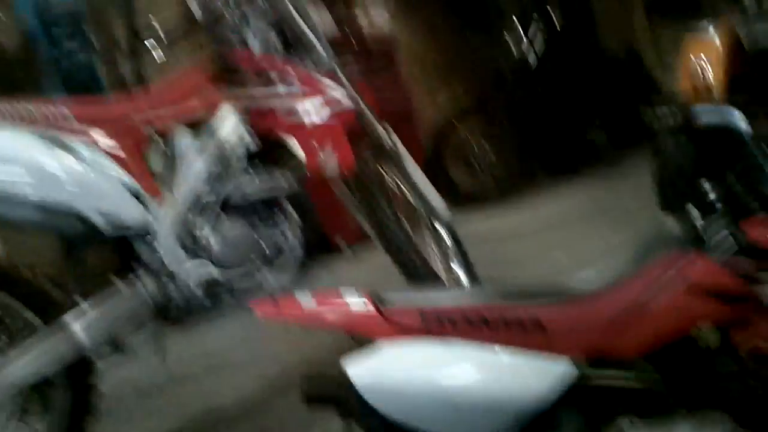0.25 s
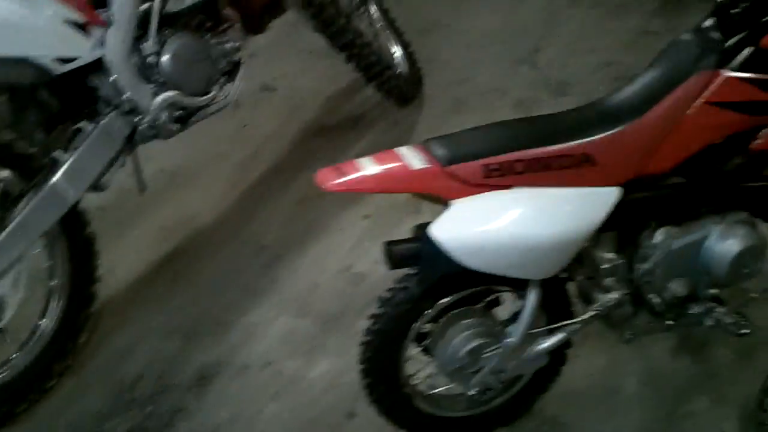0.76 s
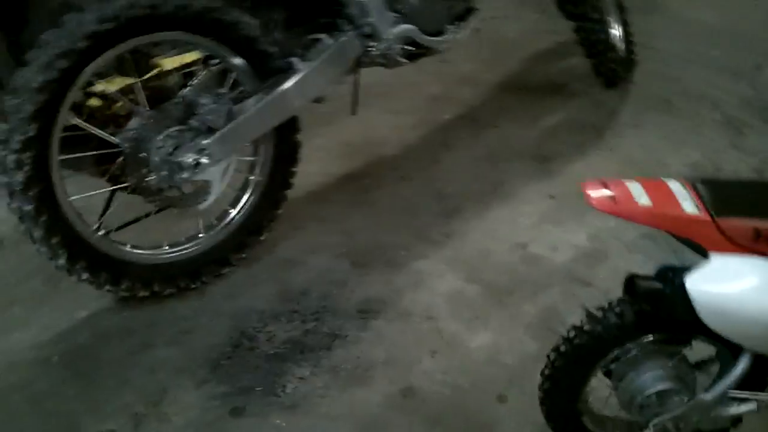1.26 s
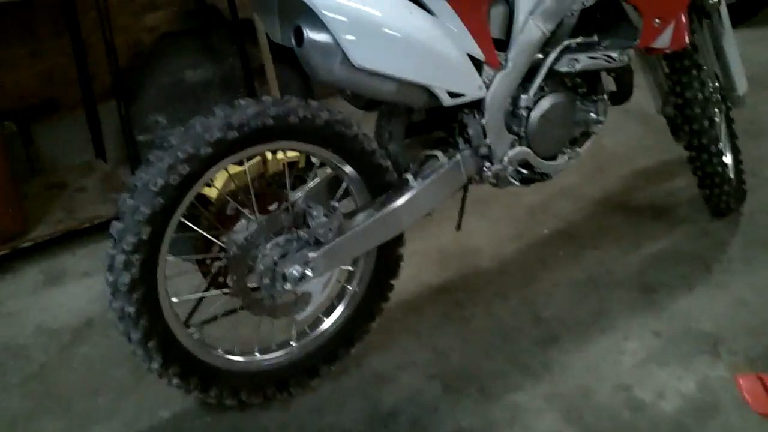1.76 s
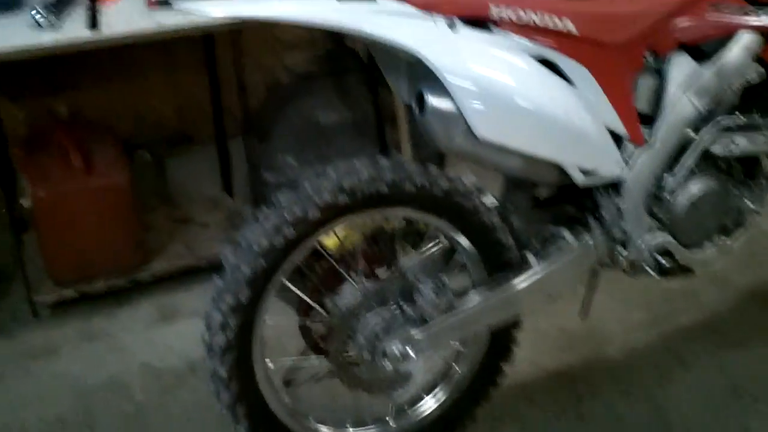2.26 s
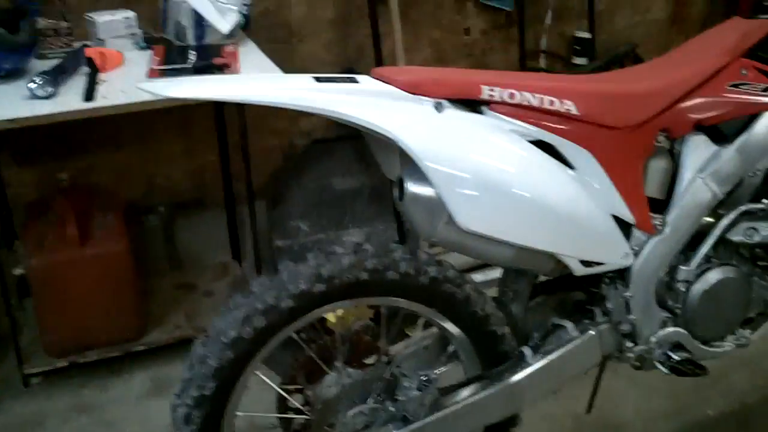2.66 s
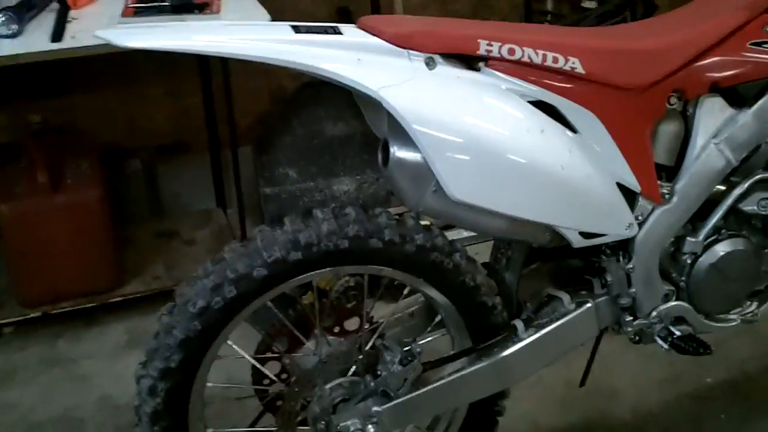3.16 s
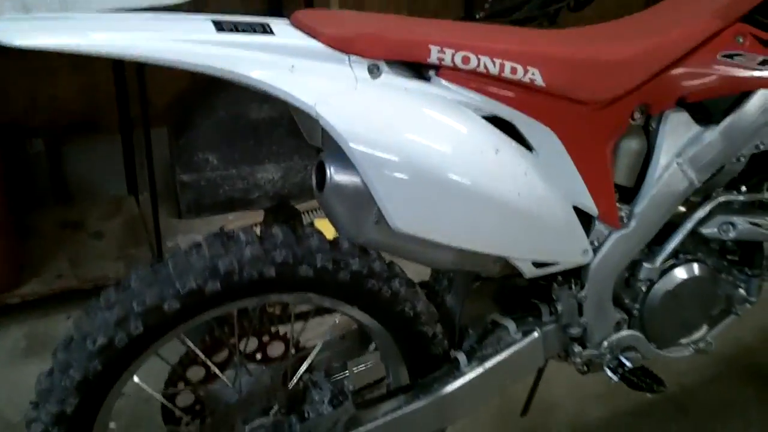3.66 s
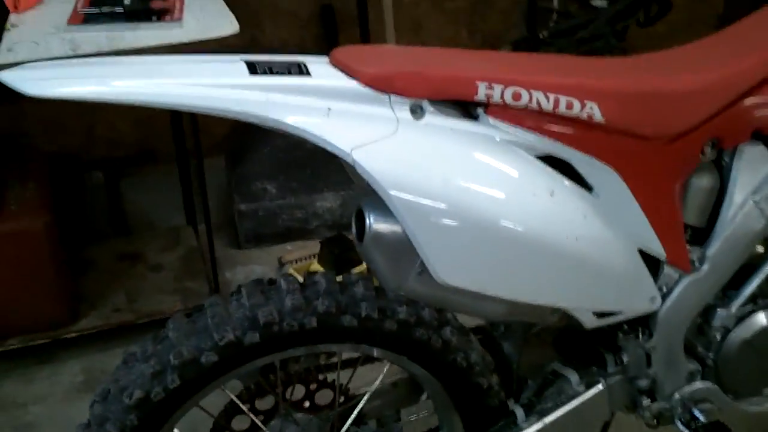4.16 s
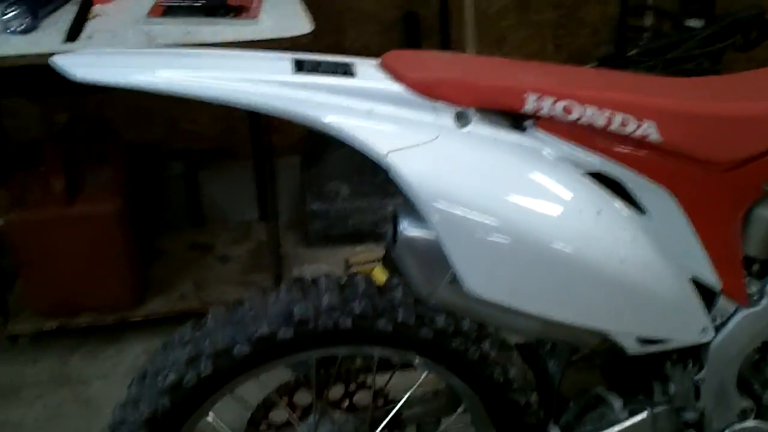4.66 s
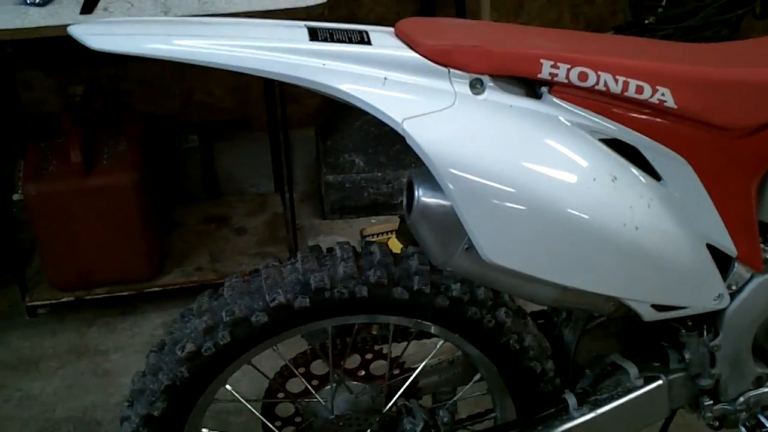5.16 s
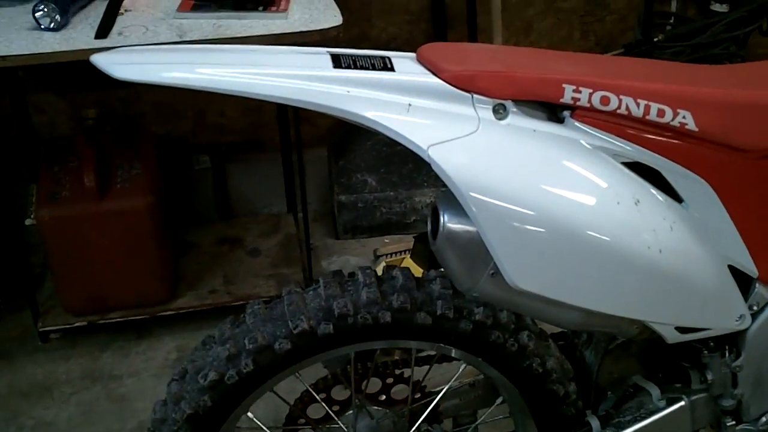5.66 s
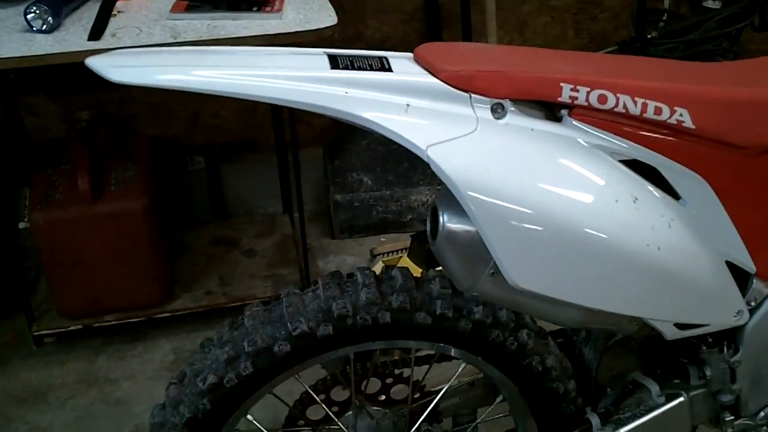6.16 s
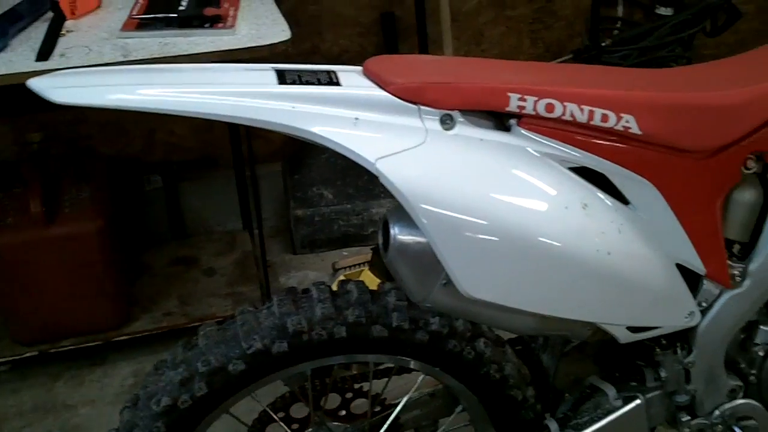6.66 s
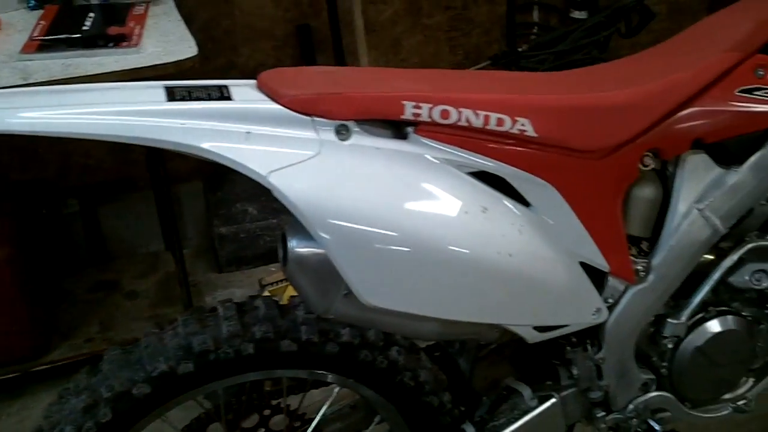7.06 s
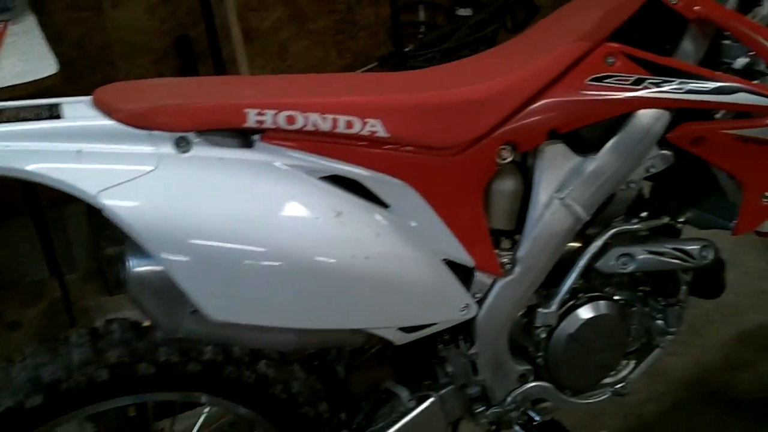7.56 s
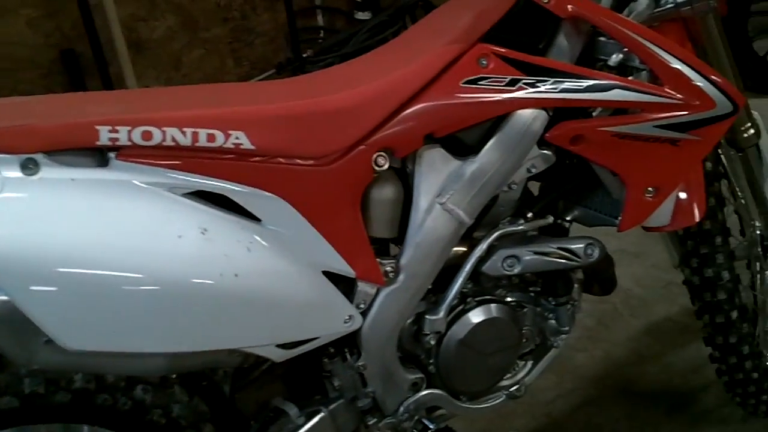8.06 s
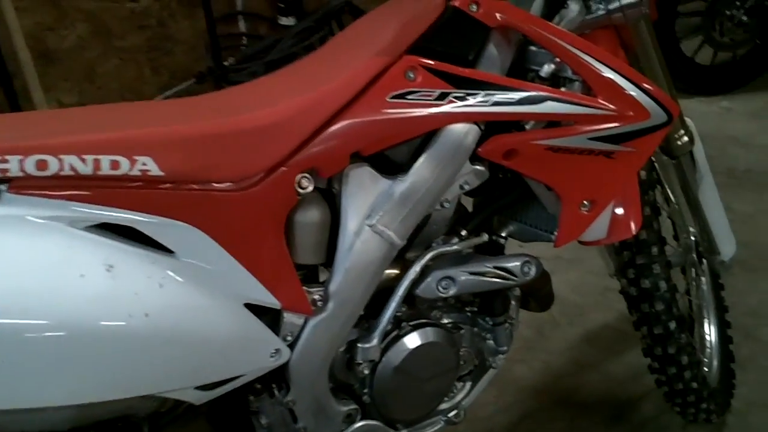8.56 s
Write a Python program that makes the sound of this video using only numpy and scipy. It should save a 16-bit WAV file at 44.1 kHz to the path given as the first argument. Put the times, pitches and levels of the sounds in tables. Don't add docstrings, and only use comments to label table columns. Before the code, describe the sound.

Continuous idle of a four-stroke off-road motorcycle in a small hard-walled garage. The exhaust note is low, rapid and hollow, hunting slightly in speed and repeatedly limping as every other firing fails and air puffs from the silencer. Around it sit hard valve ticks, rattling case metal and a steady grainy whirr. The handheld camera microphone walks closer, changing the balance of boom, bark and clatter; the engine never revs or stops.

```python
import sys
import numpy as np
from scipy import signal
from scipy.fft import rfft, irfft
from scipy.io import wavfile
from scipy.ndimage import uniform_filter1d

SR = 44100
rng = np.random.default_rng(int(sys.argv[2]) if len(sys.argv) > 2 else 0)


def generate_wav(signal):
    frames = np.transpose(np.atleast_2d(signal))
    scaled = np.clip(frames, -1, 1) * 32767
    pcm = np.round(scaled).astype(np.int16)
    wavfile.write(sys.argv[1], SR, pcm)


def invert_db(x):
    u = np.asarray(x, float) / 20
    return 10 ** u


N = 388962
TIME = np.arange(N) / SR


def level(x, db):
    return x * invert_db(db) / np.sqrt(np.mean(x ** 2))


def clicks(s, size):
    at = np.clip(s * SR, 0, N)
    i = at.astype(int)
    size = size * (s > -.005)
    early = np.bincount(i, size * (i + 1 - at), N + 2)
    late = np.bincount(i + 1, size * (at - i), N + 2)
    return (early + late)[:N]


def mode(x, hz, t60, bend=0):
    turn = np.exp(2j * np.pi * hz / SR * (np.arange(N) + bend))
    decay = np.exp(-np.log(1000) / (t60 * SR))
    return (turn * signal.lfilter([1], [1, -decay], x / turn)).imag


def ring(s, size, modes, bend=0):
    x = clicks(s, size)
    return sum(invert_db(db) * mode(x, hz, t60, bend) for hz, t60, db in modes)


def push(x, ms):
    return np.convolve(x, np.hanning(int(ms * SR / 1000) + 3))[:N]


def colour(x, points):
    hz, db = np.transpose(points)
    log_hz = np.log(np.fft.rfftfreq(N, 1 / SR) + 1)
    return irfft(rfft(x) * invert_db(np.interp(log_hz, np.log(hz), db)), N)


def flutter(rate):
    k = int(SR / rate)
    return uniform_filter1d(np.repeat(rng.standard_normal(N // k + 1), k), k)[:N]


# t/s, place (0 far wall, 1 mid floor, 2 rear wheel, 3 silencer, 4 engine)
CAMERA_WALK = [(0, 0.), (.45, 0.57), (.85, 0.7), (1.3, 1.14), (1.5, 1.3), (1.9, 1.5), (2.53, 2.),
               (2.61, 2.5), (3.5, 3.5), (4.1, 3.0), (4.4, 4), (5.5, 4), (6.5, 3.5), (7.6, 4.5), (8.1, 3.5),
               (8.82, 9)]


def camera_place():
    s, place = np.transpose(CAMERA_WALK)
    return np.interp(TIME, s, place)


PART_LEVELS = {"thump": (-24, -22, -26, -25, -24), "boom": (-24, -28.5, -39, -31, -25.5),
               "body": (-19, -28, -27.5, -22, -24), "bark": (-36, -20, -23, -21.5, -22),
               "honk": (-29.5, -38, -70, -35, -38.5), "knock": (-34, -28, -26.5, -34.5, -30),
               "whirr": (-32.5, -30.5, -30.5, -31.5, -31), "air": (-58, -55, -55, -56, -57),
               "drone": (-42, -38, -60, -62, -62), "once": (-27, -26, -26, -27, -30),
               "twice": (-28, -28, -27, -26, -24.5)}


def heard(part):
    return invert_db(np.interp(camera_place(), np.arange(5), PART_LEVELS[part]))


# t/s, time between firings [ms]
IDLE_SPEED = [(0, 30.189), (.61, 30.04), (.98, 30.716), (1.4, 29.87), (2.52, 29.124), (2.53, 29.708),
              (2.94, 30.453), (3.9, 29.672), (3.93, 30.754), (4.63, 29.024), (5.74, 30.243), (5.9, 29.124),
              (6.3, 30.68), (6.37, 29.723), (7.87, 29.201), (7.96, 30.316), (8.1, 29.381), (8.82, 28.852)]
# first t/s, last t/s, share of the burn that fails [0-1], puff level/dB
STUMBLES = [(.215, .215, .54, -55), (.365, .426, .82, -55), (.517, .637, .86, -38), (.667, .789, .66, -48),
            (1.094, 1.094, .7, -40), (1.338, 1.338, .5, -55), (1.457, 1.457, .54, -55),
            (1.932, 1.932, .87, -42), (2.256, 2.256, .88, -42), (2.402, 2.461, .7, -55),
            (2.519, 2.699, 1., -39), (2.759, 2.88, .7, -39), (3.244, 3.305, .8, -47),
            (3.786, 3.786, .97, -40), (3.905, 3.966, .9, -38), (4.329, 4.329, .9, -42),
            (4.74, 4.74, 1., -45), (5.061, 5.182, 1., -35), (5.241, 5.36, .8, -40), (5.57, 5.631, .95, -42),
            (6.077, 6.137, .8, -39), (6.319, 6.319, 1., -37), (6.587, 6.587, 1., -50),
            (6.706, 6.706, 1., -38), (7.002, 7.002, .97, -44), (7.121, 7.239, .6, -55),
            (7.592, 7.592, 1., -43), (7.738, 7.738, .87, -36), (7.884, 7.884, .6, -52),
            (8.444, 8.561, .63, -47)]


def firings():
    drag_ms, drag_kept, margin_s, first_puff_db = .1525, .5, .015, 4
    fire, miss, puff, drag = [-.0869], [0.], [0.], 0.
    while fire[-1] < N / SR:
        drag = drag_kept * drag + drag_ms * miss[-1]
        period = np.interp(fire[-1], *np.transpose(IDLE_SPEED)) + drag
        now = fire[-1] + period / 1000
        failed, spit = 0., 0.
        for first, last, share, db in STUMBLES:
            inside = first - margin_s < now < last + margin_s
            just_missed = miss[-1] > 0 and fire[-1] > first - margin_s
            if inside and not just_missed:
                hardest = now < first + margin_s and last > first + .1
                failed, spit = share, invert_db(db + first_puff_db * hardest)
                break
        fire.append(now)
        miss.append(failed)
        puff.append(spit)
    return np.array([fire, miss, puff])


def pipe_cooling(miss):
    return signal.lfilter([1], [1, -0.72], np.roll(miss, 1))


# f/Hz, t60/s, level/dB
THUMP_RINGS = [(94.3, 0.061, 8), (62, .05, -4)]


def piston_thump(s, miss, cool):
    pump, cool_pump, unburnt, early_s = 0.51, 0.17, 0.56, .001
    size = -(pump * np.exp(-cool_pump * cool) + unburnt * miss)
    thump = push(ring(s + .0004 - early_s * miss, size, THUMP_RINGS), ms=3.)
    thump = colour(thump, [(30, -44), (55, -21.5), (80, -9.5), (900, 24.5)])
    return heard("thump") * level(thump, 0.17)


def firing_hum(fire):
    angle = 2 * np.pi * np.interp(TIME, fire, np.arange(len(fire)))
    once, twice = np.cos(angle - 2.2), np.cos(2 * angle - 4.15)
    return np.sqrt(2) * (heard("once") * once + heard("twice") * twice)


# f/Hz, t60/s, level/dB
BOOM_RINGS = [(132.9, 0.24, 0.015)]
BODY_RINGS = [(160, 0.051, -7), (202, 0.026, -17), (209, 0.053, -13)]
BARK_RINGS = [(302.7, 0.095, 7), (252, 0.024, -5)]
HONK_RINGS = [(402, 0.11, 7.5), (441.7, 0.12, 5.5), (461, 0.2, -7.5), (549, 0.067, 5.5)]
# f/Hz, t60/s, level/dB
DRONE_RINGS = [(491, 0.11, -1), (800, 0.1, -4)]
RETURN_FADE = (1.3, 1.7)
BARK_DETUNE = (-.004, -0.008, 0.034, .004, -0.0028)


def pipe_rings(fire, s, miss, strength_db, cool):
    leftover, leftover_body, cool_pitch = 0.24, 0.23, 0.0081
    burn = -(1 - miss) ** 0.65 * (1 + leftover * np.roll(miss, 1)) * invert_db(strength_db)
    rich = 1 + leftover_body * cool
    back = np.interp(s, RETURN_FADE, (.06, 1))
    both = np.r_[(1 - .75 * back) * burn, -back * burn]
    bend = np.cumsum(-cool_pitch * np.interp(TIME, fire, cool))
    sharp = np.cumsum(np.interp(camera_place(), np.arange(len(BARK_DETUNE)), BARK_DETUNE))
    honk_size = burn * invert_db(rng.standard_normal(len(s)))
    rings = {
        "boom": push(ring(np.r_[s - .001, s + .0078], both, BOOM_RINGS), ms=1.5),
        "body": push(ring(np.r_[s, s + .007], both * np.tile(rich, 2), BODY_RINGS, bend), ms=1.5),
        "bark": push(ring(s - .001, burn, BARK_RINGS, bend + sharp), ms=3.),
        "honk": push(ring(s, honk_size, HONK_RINGS, bend), ms=1.46),
        "drone": push(ring(s, burn, DRONE_RINGS), ms=0.84),
    }
    mix = sum(heard(part) * level(x, 0) for part, x in rings.items())
    return colour(mix, [(40, -6), (75, -68), (110, 3.0), (520, -0.5), (900, -12)])


# time after the exhaust opens [ms], level/dB
VALVE_KNOCKS = [
    (-6.5, -6.5),
    (-4.5, 11),
    (-1.5, -1.5),
    (-0.5, -1),
    (2.5, 5.5),
    (9, 4.5),
    (14, -28),
]


def valve_blows(fire):
    ms, db = np.transpose(VALVE_KNOCKS)
    chance = rng.standard_normal((len(fire), len(ms), 2))
    s = fire[:, None] + ms / 1000 + 0.00019 * chance[..., 0]
    size = invert_db(db + 2.5 * chance[..., 1])
    return s.ravel(), size.ravel()


def garage(x, t60=0.046, wet_db=-8):
    t = TIME[:SR // 2]
    tail = rng.standard_normal(len(t)) * (t > .004) * np.exp(-np.log(1000) * t / t60)
    return x + invert_db(wet_db) * signal.fftconvolve(x, tail / np.sqrt(np.sum(tail ** 2)))[:N]


# f/Hz, t60/s, level/dB
CASE_MODES = [(576, 0.08, -11.5), (806, 0.075, -14.5), (1140, 0.016, -12), (1369, 0.062, -1.5),
              (1610, 0.022, 0), (2345, 0.019, -1.5), (3980, 0.013, 1)]


def valve_knocks(s, size, shake):
    knocks = garage(level(ring(s, size, CASE_MODES), -3.36))
    rattle = rng.standard_normal(N) * (1 + 0.53 * shake)
    rattle = colour(rattle, [(900, -16.5), (1250, 2.5), (1600, 1.5), (2500, 1), (3200, -30.0)])
    return heard("knock") * (knocks + level(rattle, -9.0))


# f/Hz, level/dB
CLATTER_TONE = [(350, -18), (500, -9.5), (800, -6), (1100, -2.5), (1380, 0), (1800, -3), (2600, -11),
                (3900, -8), (5000, -11), (6000, -36.5)]


def clatter(fire, size=1300):
    likeness, settle = 0.884, 30
    cycles = rng.standard_normal((len(fire) + settle, size))
    cycles = signal.lfilter([1], [1, -likeness], cycles, axis=0)[settle:]
    crank = np.interp(TIME, fire, np.arange(len(fire)) * size).astype(int)
    return colour(cycles.ravel()[crank], CLATTER_TONE)


# f/Hz, level/dB
WHIRR_TONE = [(50, 4.5), (160, 11), (540, -7.5), (800, -6.5), (1400, -5.5), (2400, -6.5), (3300, -9.5),
              (3900, -5.5), (4950, -5.5), (5050, -20), (5800, -21), (6500, -15), (7400, -28.5),
              (7700, -34.5)]


def gear_whirr(fire, shake, gust):
    noise = rng.standard_normal(N) * (1 + 0.25 * shake + 0.16 * gust)
    whirr = colour(noise * invert_db(1.62 * flutter(rate=25)), WHIRR_TONE)
    return heard("whirr") * (level(whirr, 5.12) + level(clatter(fire), 1))


# f/Hz, level/dB
AIR_TONE = [(7000, -47), (8000, -9), (9500, -2.5), (12000, 0.5), (14500, -6), (15200, -14), (15330, -30)]


def top_air(shake, gust):
    shared = rng.standard_normal(N)
    sides = []
    for own in rng.standard_normal((2, N)):
        swell = (1 + .05 * shake + 0.83 * gust) * invert_db(1.1 * flutter(rate=12))
        sides.append(colour((shared + .62 * own) * swell, AIR_TONE))
    return heard("air") * level(np.array(sides), 0)


# f/Hz, t60/s, level/dB
COUGH_RINGS = [(111, 0.051, -6), (150, 0.027, 0)]


def cough(s, miss):
    return level(push(ring(s - .0012, -miss ** 2, COUGH_RINGS), ms=3.8), -34)


def puff_gust(fire, spit):
    burst = clicks(fire + .006, spit * invert_db(54))
    gust = signal.lfilter([1], [1, -np.exp(-1 / (0.002 * SR))], burst)
    return uniform_filter1d(gust, size=90)


# f/Hz, level/dB
PUFF_TONE = [(500, -30), (1500, 0), (4500, 1), (6000, -12), (8500, -19), (13000, -14), (15300, -18),
             (16000, -50)]


def silencer_puff(gust):
    return level(colour(rng.standard_normal(N) * gust, PUFF_TONE), -53)


def exhaust(fire, miss):
    s = fire + .0001 * rng.standard_normal(len(fire))
    strength_db = 1.3 * rng.standard_normal(len(fire))
    cool = pipe_cooling(miss)
    low = piston_thump(s, miss, cool) + firing_hum(fire)
    return low + pipe_rings(fire, s, miss, strength_db, cool) + cough(s, miss)


def engine_case(fire, spit):
    s, size = valve_blows(fire)
    shake = level(push(clicks(s, size), ms=6.3), 0)
    gust = puff_gust(fire, spit)
    case = valve_knocks(s, size, shake) + gear_whirr(fire, shake, gust)
    return case + top_air(shake, gust) + silencer_puff(gust)


def scene():
    fire, miss, spit = firings()
    return exhaust(fire, miss) + engine_case(fire, spit)


def band_limit(x):
    return signal.sosfilt(signal.butter(12, 15300, fs=SR, output="sos"), x)


# f/Hz, width [Hz], level/dB
BAND_GAPS = [(2713, 150, -18.5), (5490, 152, -39), (7790, 360, -60), (10870, 240, -55)]


def record(dry):
    hz = np.fft.rfftfreq(N, 1 / SR)
    gain = hz ** 2 / (hz ** 2 + 18 ** 2)
    for f, width, db in BAND_GAPS:
        gain = gain * np.hypot(invert_db(db), 1 - 1 / (1 + ((hz - f) / width) ** 2))
    lag = np.exp(-2j * np.pi * hz * 0.93 / SR * np.array([[1], [0]]))
    rounded = np.tanh(1.18 * dry) / 1.291
    mix = irfft(rfft(rounded) * gain * lag, N)
    return band_limit(mix)


dry = scene()
out = record(dry)
generate_wav(out)
```